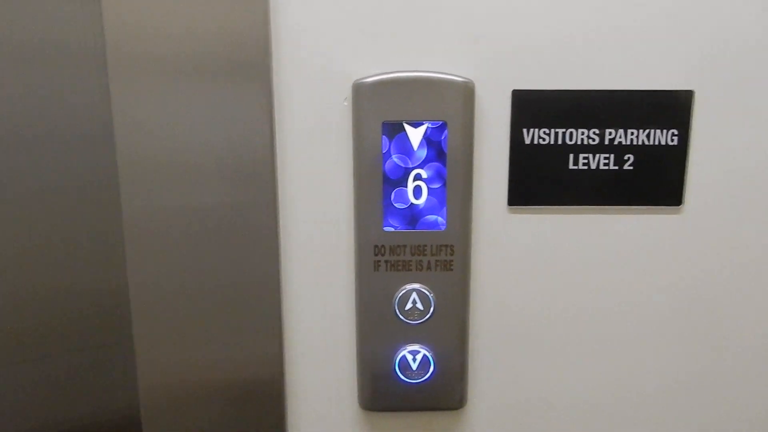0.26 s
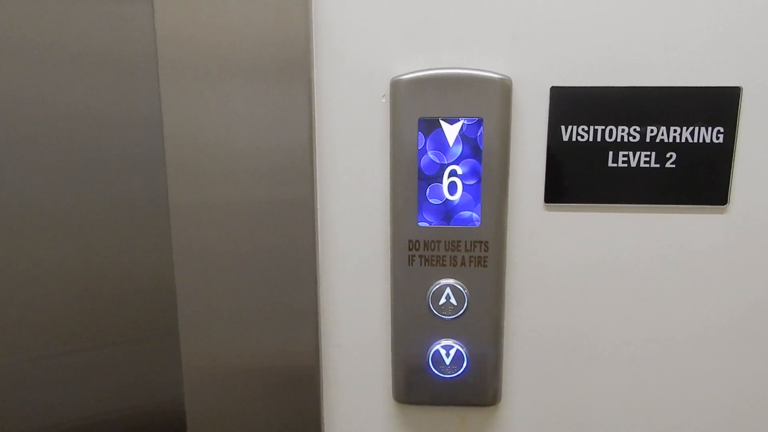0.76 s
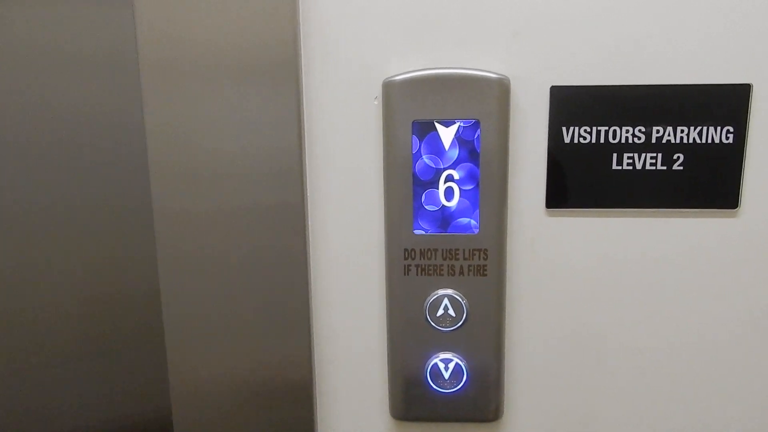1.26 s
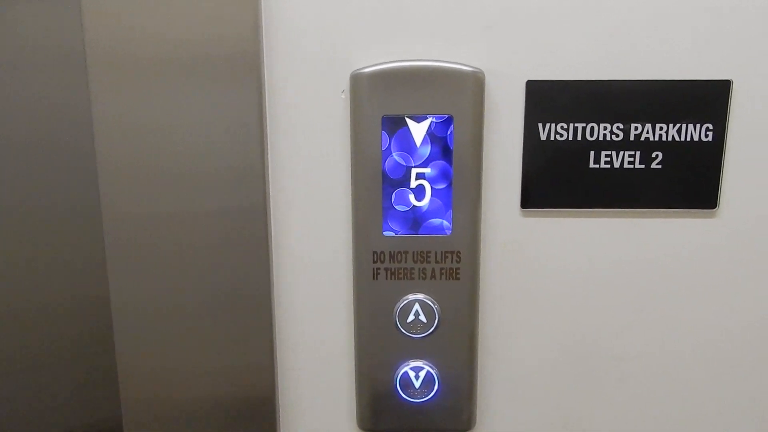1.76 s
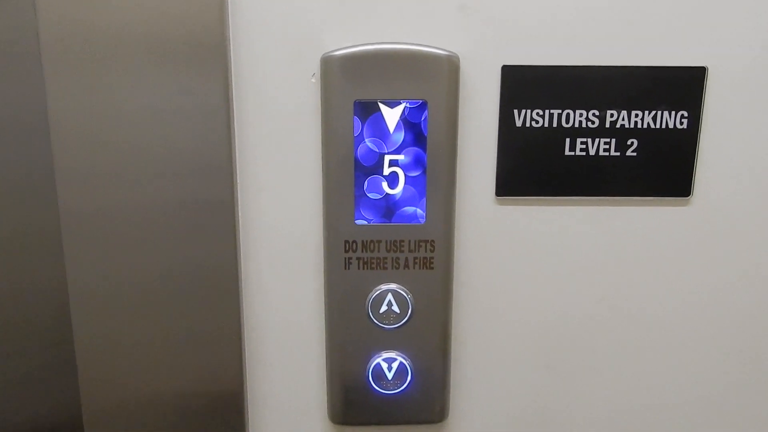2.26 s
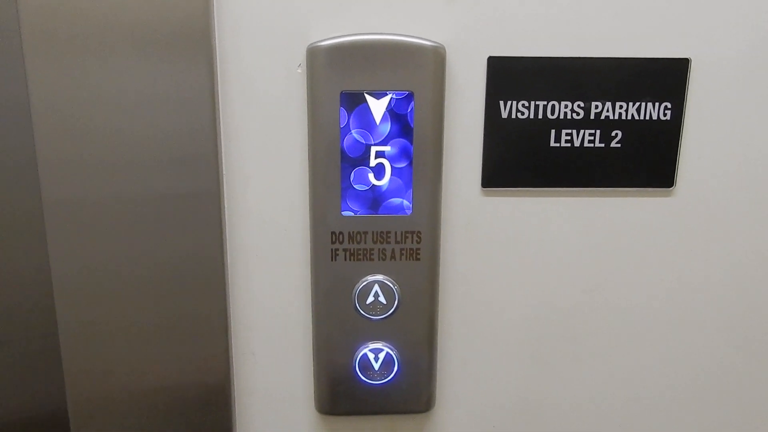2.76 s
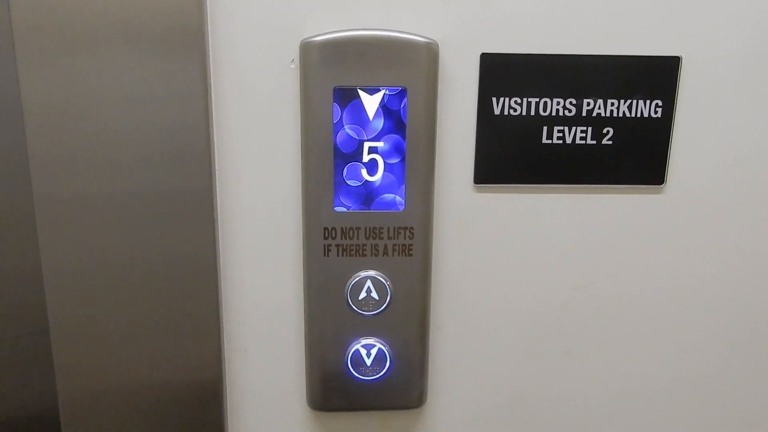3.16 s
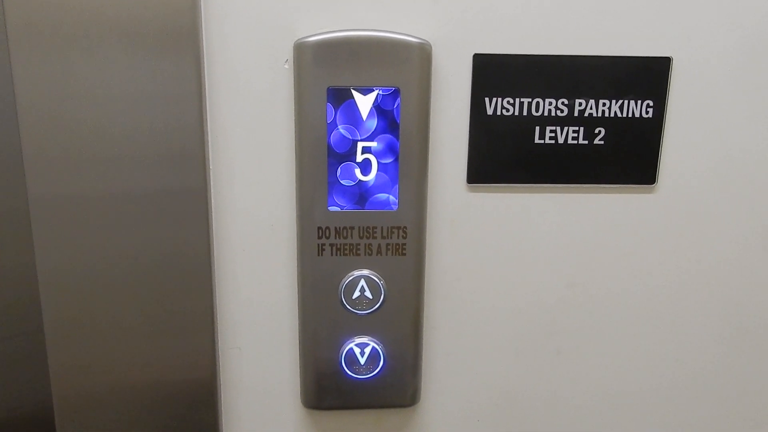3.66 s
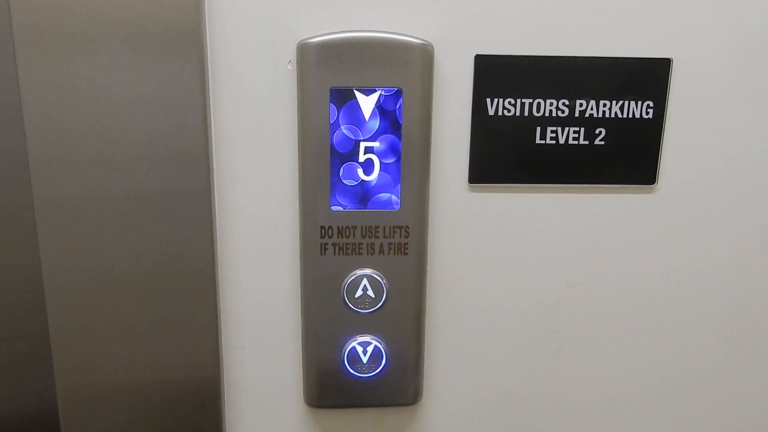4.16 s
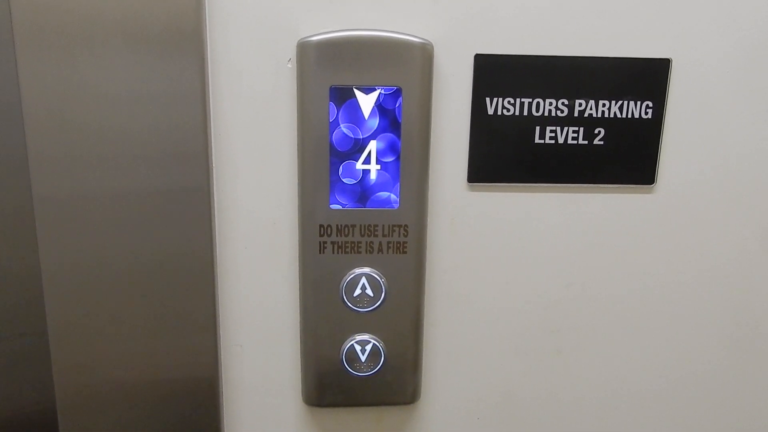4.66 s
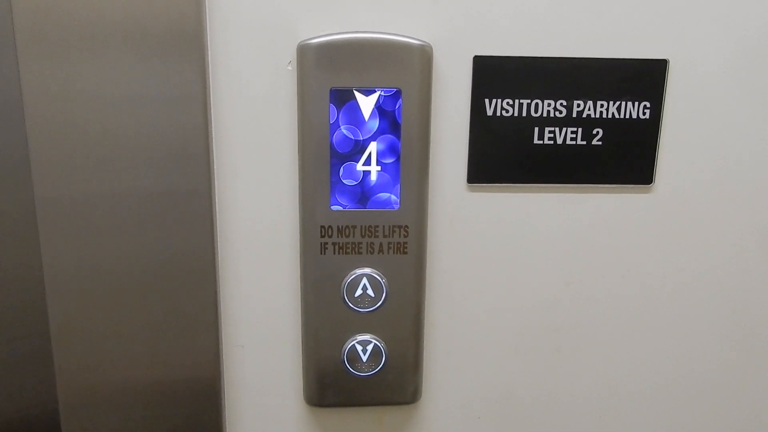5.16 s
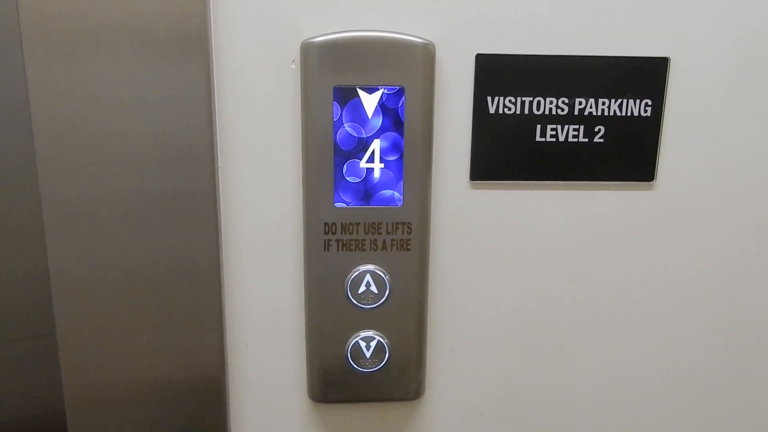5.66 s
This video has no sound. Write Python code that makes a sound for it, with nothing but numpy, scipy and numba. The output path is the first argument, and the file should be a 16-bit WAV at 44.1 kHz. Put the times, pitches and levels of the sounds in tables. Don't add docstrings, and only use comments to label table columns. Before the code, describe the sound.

Close to closed lift doors in a quiet indoor lobby, a steady low mains hum and soft ventilation continue throughout. Air pushed by a descending car whistles breathily through the door gaps, with small squeals. The rush swells from about two seconds, peaks near four, then whistle and rush sink and fade as a low drive tone briefly rises.

```python
import sys
import numpy as np
from scipy import signal
from scipy.fft import rfft, irfft
from scipy.io import wavfile
from scipy.ndimage import uniform_filter1d
from numba import njit

SR = 44100
rng = np.random.default_rng(int(sys.argv[2]) if len(sys.argv) > 2 else 0)


def gain_from_db(level_db):
    decades = np.asarray(level_db, float) / 20
    return 10 ** decades


def transcribe(signal):
    frames = np.atleast_2d(signal).T
    limited = np.clip(frames, -1, 1)
    pcm = np.round(limited * 32767).astype(np.int16)
    wavfile.write(sys.argv[1], SR, pcm)


N = 260785


def along(table):
    s, *columns = np.transpose(table)
    return [np.interp(np.arange(N) / SR, s, c) for c in columns]


def ramp(from_s, over_s):
    return np.clip((np.arange(N) / SR - from_s) / over_s, 0, 1)


def car_near():
    return ramp(2.21, 1.3)


def braking():
    return ramp(4.88, 0.9)


def unit(x):
    return x / np.sqrt(np.mean(x ** 2))


def walk(rate):
    hold = int(SR / rate)
    steps = np.repeat(rng.standard_normal(N // 50), hold)[:N]
    return unit(uniform_filter1d(uniform_filter1d(steps, hold), hold))


def shape(points, hz):
    f, db = np.transpose(points)
    return gain_from_db(np.interp(np.log(hz + 1), np.log(f), db))


def colour(x, points):
    return irfft(rfft(x) * shape(points, np.fft.rfftfreq(N, 1 / SR)), N)


def pair(mid, side):
    return np.array([mid + side, mid - side])


# (frequency [Hz], side over mid [dB])
AIR_SIDE = [(30, -8), (80, -9), (300, -7), (700, -13), (1300, -12), (2400, -17), (4400, -10), (8100, -1.5),
            (15000, -.5)]


def diffuse(points, zone_hz=(0, SR)):
    hz = np.fft.rfftfreq(N, 1 / SR)
    gain = shape(points, hz) * (hz >= points[0][0]) * (hz <= points[-1][0])
    mid, side = rfft(rng.standard_normal((2, N))) * gain
    zone = irfft(mid * (hz > zone_hz[0]) * (hz < zone_hz[1]), N)
    return pair(irfft(mid, N), irfft(side * shape(AIR_SIDE, hz), N)) / np.std(zone)


@njit
def resonate(x, hz, width):
    y, band, low = np.empty(len(x)), 0., 0.
    for i in range(len(x)):
        g = np.tan(np.pi * hz[i] / SR)
        damping = width[i] / hz[i]
        v = (band + g * (x[i] - low)) / (1 + g * (g + damping))
        band = 2 * v - band
        low = low + 2 * g * v
        y[i] = damping * v / width[i] ** .25
    return y


def whistle(hz, width_hz, side_db):
    hz = hz + np.zeros(N)
    width = np.maximum(width_hz, 1) + np.zeros(N)
    noises = rng.standard_normal((2, N))
    mid, side = (unit(resonate(resonate(n, hz, width), hz, width)) for n in noises)
    return pair(mid, gain_from_db(side_db) * side)


def tone(hz, side_db=-28):
    phase = 2 * np.pi * (np.cumsum(hz + np.zeros(N)) / SR + rng.random())
    return np.sqrt(2) * pair(np.sin(phase), gain_from_db(side_db) * np.cos(phase))


# (multiple of mains [1], level [dB], waver [dB])
HUM = [
    (2, -56.3, .7),
    (3, -39.3, .3),
    (4, -59, 1.2),
    (6, -63, 2.0),
]
# (frequency [Hz], width [Hz], level [dB], side over mid [dB])
BALLAST = (10000, 380, -80, 0)
# (frequency [Hz], density [dB per Hz])
ROOM = [(15, -11), (38, -5.5), (60, -7.5), (125, -1.5), (190, -1.5), (300, -4.5), (500, -13.5),
        (1000, -21.5), (1400, -26), (2400, -27.5), (4000, -24), (7000, -36.5), (11000, -50), (15600, -47)]


def building():
    mains_hz = 49.95
    hum = sum(tone(k * mains_hz) * gain_from_db(db + waver_db * walk(3.51)) for k, db, waver_db in HUM)
    hz, width_hz, db, side_db = BALLAST
    buzz = whistle(hz, width_hz, side_db) * gain_from_db(db)
    ventilation = diffuse(ROOM) * gain_from_db(-51.5 + .5 * walk(3.06))
    return hum + buzz + ventilation


# (time [s], main tone [Hz], level [dB])
DRIVE = [(0, 144, -75), (2.6, 143.5, -68), (3.0, 142, -53), (3.6, 139.5, -57), (3.9, 137, -68),
         (4.2, 132.5, -56), (4.8, 130, -52), (5.0, 129.2, -46), (5.15, 129, -42.5), (5.35, 128.8, -47),
         (5.55, 126.5, -58), (5.75, 124, -52), (5.92, 123, -55)]
# (multiple of main tone [1], panel [Hz], panel width [Hz], level [dB], blur [Hz])
ORDERS_IN_PANELS = [
    (0.662, 86.4, 2.7, -55, 1.2),
    (1.98, 254.8, 10, -56, 3.3),
    (2.999, 415, 8.4, -55, 8.6),
    (4.95, 676, 51, -50, 74),
    (6.05, 840.6, 53, -49.5, 38),
]


def drive():
    hz, main_db = along(DRIVE)
    load_db = -14 * (1 - car_near()) - 32 * braking()
    out = tone(hz * (1 + 0.00216 * walk(3.73))) * gain_from_db(main_db)
    for multiple, panel_hz, width_hz, db, blur_hz in ORDERS_IN_PANELS:
        order_hz = multiple * hz
        response = 1 / (1 + (2 * (order_hz - panel_hz) / width_hz) ** 2)
        out = out + whistle(order_hz, blur_hz, -19.0) * response * gain_from_db(db + load_db)
    return out


# (start [s], end [s], pitch
# [Hz], blur [Hz], level [dB])
SQUEALS = [(.48, .9, 11770, 40, -76), (1.8, 2.17, 11762, 30, -73), (0, .15, 2100, 500, -64),
           (2.35, 3.05, 184, 3, -55), (1.2, 2.9, 868, 12, -68), (.05, .6, 3850, 350, -67),
           (.08, .55, 3000, 300, -57), (.15, .5, 6050, 300, -69), (2.28, 2.68, 6090, 240, -57),
           (2.35, 2.67, 6110, 70, -58), (1.35, 1.65, 4950, 200, -59), (3.1, 3.35, 6050, 200, -64),
           (1.0, 1.4, 5170, 60, -62), (1.75, 2.0, 5525, 50, -61), (3.8, 5.1, 5900, 300, -63),
           (4.4, 4.85, 655, 40, -57), (3.6, 3.9, 3550, 120, -63), (3.6, 3.9, 2350, 200, -56),
           (2.3, 2.6, 2030, 200, -58)]


def squeals():
    out = 0
    f, side_db = np.transpose(AIR_SIDE)
    for start, end, hz, blur_hz, db in SQUEALS:
        swell = np.sqrt(np.abs(np.sin(np.pi * ramp(start, end - start))))
        out = out + whistle(hz, blur_hz, np.interp(hz, f, side_db)) * swell * gain_from_db(db)
    return out


# (frequency [Hz], density [dB per Hz])
AIR_COLOURS = [
    [(200, -6.5), (400, -1.5), (650, 1.5), (900, -0.5), (1100, -2), (1400, -10), (1800, -19)],
    [(1200, -46), (1450, -13), (1900, -2.5), (2500, 1), (3000, -5), (3400, -15.5)],
    [(2600, -6), (3200, -1.5), (3800, -1), (4700, -4.5), (5600, 1), (6300, -4), (7000, -7), (8500, -12),
     (9500, -27)],
    [(6000, -27), (8000, 0), (9200, -1), (10000, 2), (11400, -2.5), (12000, -10.5), (13000, -11),
     (15600, -17)],
]
# (from [Hz], to [Hz])
AIR_ZONES_HZ = [
    (450, 1250),
    (1650, 2300),
    (3300, 4500),
    (9000, 11500),
]
# (level [dB], slope [dB per dB of draught], gain near [dB], change in braking [dB])
AIR_PARTS = [
    (-57, 1.02, 4.5, 1),
    (-55, 1.06, 0.86, 1.5),
    (-62.5, 0.7, 3, -7),
    (-67, .5, 1.2, -9),
]
# (time [s], strength [dB])
DRAUGHT = [(0, -7.5), (.2, -8.5), (.9, -10), (1.4, -8.5), (1.9, -4), (2.2, -2.5), (2.45, 1.5), (2.75, -2.5),
           (3.1, 0), (3.3, 2.5), (3.6, 2), (3.82, 5), (4.1, -0.1), (4.35, -2), (4.75, 1), (5.1, -6),
           (5.45, -9), (5.92, -13.5)]


def shaft_air():
    gust_db = .6 * walk(9)
    draught_db, = along(DRAUGHT)
    near, brake = car_near(), braking()
    out = 0
    for (db, slope, near_db, brake_db), points, zone in zip(AIR_PARTS, AIR_COLOURS, AIR_ZONES_HZ):
        level_db = db + slope * draught_db + near_db * near + brake_db * brake
        flicker_db = gust_db + 0.5 * walk(15)
        out = out + diffuse(points, zone) * gain_from_db(level_db + flicker_db)
    return out


# (time [s], pitch [Hz], level [dB])
WIDE_GAP = [(0, 2650, -54.5), (.15, 2480, -50), (.35, 2625, -52.5), (.85, 2780, -49.5), (1.05, 2730, -53),
            (1.5, 2826, -52), (1.85, 2790, -49), (2.55, 2815, -48), (2.8, 2680, -45), (3.2, 2768, -46),
            (3.5, 2810, -47.5), (4.3, 2740, -46), (4.75, 2750, -46.5), (5.2, 2730, -52), (5.4, 2670, -46),
            (5.57, 2600, -51), (5.63, 2540, -56), (5.92, 2470, -67)]
# (frequency [Hz], gain [dB])
SLOT = [(2200, -3), (2480, -4), (2620, 0), (2930, 0), (3000, -7), (3400, -8)]
# (time [s], pitch [Hz], level [dB])
THIN_GAP = [(0, 4580, -69), (.3, 4700, -71), (.6, 4800, -60.5), (1.0, 5140, -57.5), (1.35, 5180, -58.5),
            (1.5, 5140, -56), (1.85, 5550, -51), (2.4, 5690, -56), (2.7, 5300, -60), (3.15, 5400, -60.5),
            (3.45, 5580, -52.5), (3.8, 5800, -64), (4.35, 5430, -73), (4.65, 5700, -68), (4.82, 5860, -68),
            (5.25, 5520, -65), (5.55, 4920, -72), (5.92, 4750, -85)]


def door_gaps():
    wide_hz, wide_db = along(WIDE_GAP)
    thin_hz, thin_db = along(THIN_GAP)
    wide = 0
    for split_hz in (-65, 65):
        strand_hz = wide_hz + split_hz + 15 * walk(4.12)
        strand = whistle(strand_hz, width_hz=140, side_db=-18)
        wide = wide + strand * gain_from_db(0.47 * walk(3.25) - 2.5)
    wide = colour(wide, SLOT)
    thin = whistle(thin_hz * (1 + 0.0068 * walk(12)), width_hz=450, side_db=-8)
    return wide * gain_from_db(wide_db + 1.26 * walk(13)) + thin * gain_from_db(thin_db + 1.1 * walk(13))


def lobby(x):
    t60_s, tail_db = .3, -15
    t = np.arange(SR // 2) / SR
    tail = rng.standard_normal(len(t)) * gain_from_db(-60 * t / t60_s)
    tail *= gain_from_db(tail_db) / np.sqrt(np.sum(tail ** 2))
    tail[0] = 1
    tail /= np.sqrt(np.sum(tail ** 2))
    lead_in = np.concatenate([x[:, len(t):0:-1], x], axis=1)
    return signal.fftconvolve(lead_in, tail[None])[:, len(t):len(t) + N]


# (frequency [Hz], left over right [dB])
LEFT_LEAD = [(60, .2), (150, .5), (1300, .4), (2400, 0), (4400, -.7), (6500, -.3), (8100, 1.3),
             (15000, 1.2)]


def scene():
    left, right = lobby(door_gaps() + shaft_air() + squeals()) + drive() + building()
    half = np.array(LEFT_LEAD) * [1, .5]
    return np.array([colour(left, half), colour(right, half * [1, -1])])


# (from [Hz], to [Hz])
STARVED_HZ = (12000, 12720)
# (start [s], end [s], above [Hz])
TOP_DROPS = [
    (.07, .79, 15050),
    (1.87, 1.96, 15000),
    (1.94, 2.0, 12700),
    (1.99, 2.04, 12000),
    (5.05, 5.2, 15200),
    (5.38, 5.45, 15050),
    (5.58, 5.63, 15200),
    (5.7, 5.91, 15000),
]
# (frequency [Hz], in mid [1], in side [1])
PATCHY = [(1200, 0, .05), (2000, 0, .08), (3000, 0, .2), (4500, 0, .1), (5500, 0, .03), (11000, 0, .04),
          (12720, .02, .15), (14800, .05, .15), (15200, .3, .7), (15700, .5, .9)]


def low_pass(x):
    return signal.sosfilt(signal.butter(12, 15730, fs=SR, output="sos"), x)


def record(dry):
    hz, t, spec = signal.stft(pair(*dry) / np.sqrt(2), SR, nperseg=1024)
    rows = hz[:, None]
    hiss = np.sum(np.abs(spec[:, (hz > 10500) & (hz < 11900)]) ** 2, axis=(0, 1))
    ragged = uniform_filter1d(rng.standard_normal((2, len(hiss))), size=4)
    starved = signal.lfilter([.06], [1, -.94], hiss) > gain_from_db(2 * -71.8 + 5 * ragged[0])
    low_edge = STARVED_HZ[0] + 60 + 450 * ragged[1]
    keep = ~(starved & (rows > low_edge) & (rows < STARVED_HZ[1]))
    for start, end, above_hz in TOP_DROPS:
        keep &= ~((rows > above_hz) & (t > start) & (t < end))
    cells = np.kron(rng.random((2, 65, len(t) // 3 + 1)), np.ones((1, 8, 3)))[:, :len(hz), :len(t)]
    f, *shares = np.transpose(PATCHY)
    empty_share = np.array([np.interp(hz, f, share, left=0) for share in shares])
    keep = keep & (cells > empty_share[:, :, None])
    wet = signal.istft(spec * keep, SR, nperseg=1024)[1][:, :N]
    return low_pass(pair(*wet) / np.sqrt(2))


dry = scene()
out = record(dry)
transcribe(out)
```